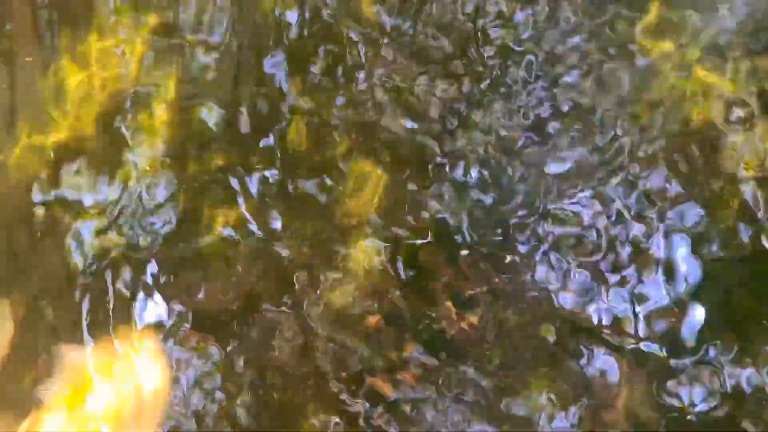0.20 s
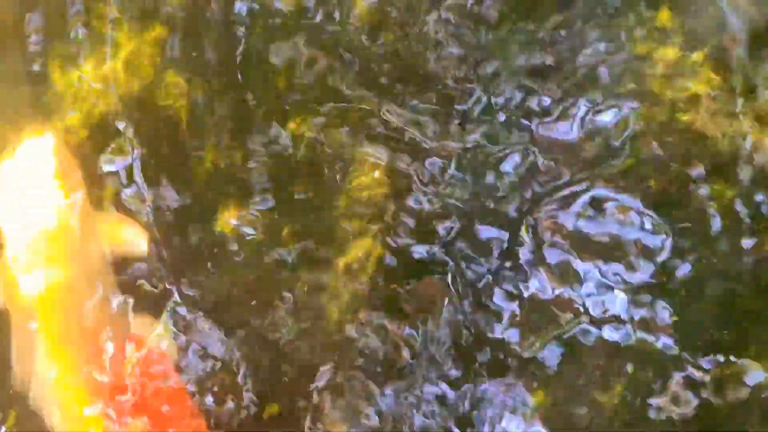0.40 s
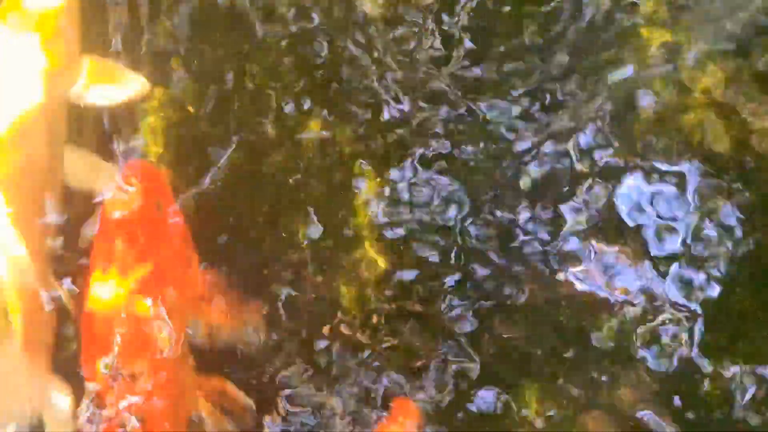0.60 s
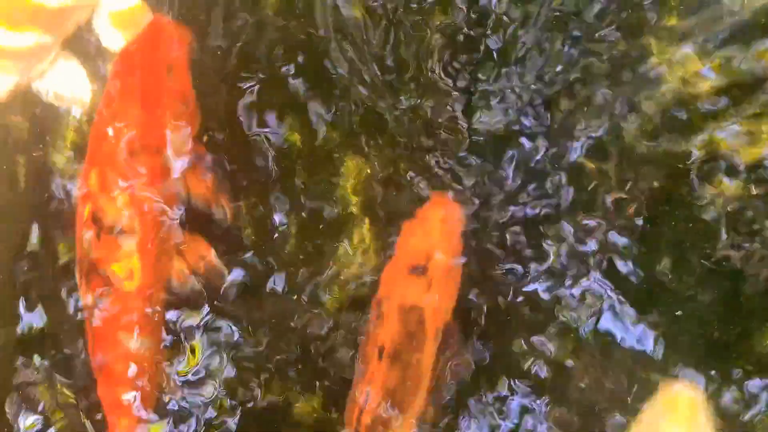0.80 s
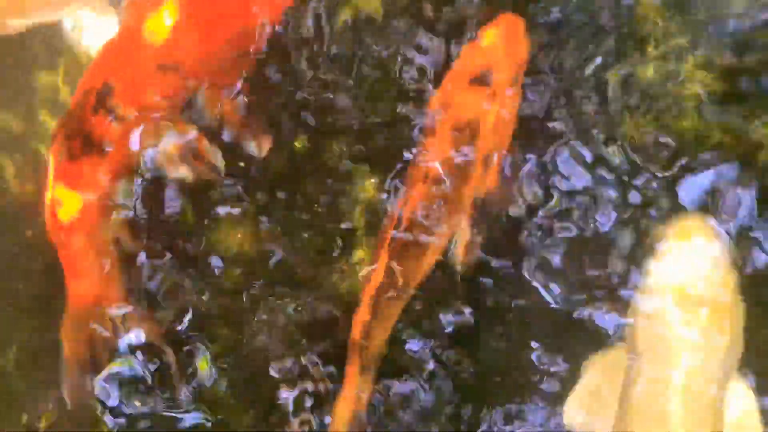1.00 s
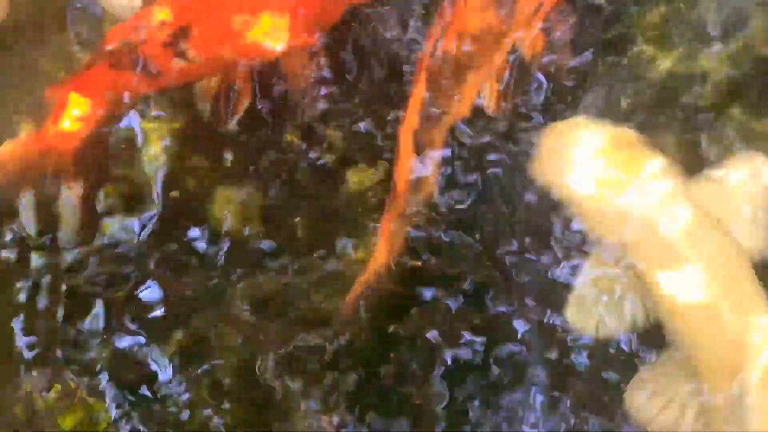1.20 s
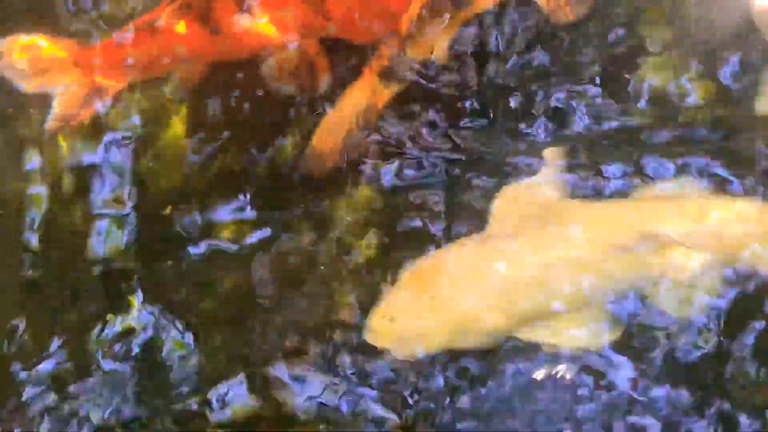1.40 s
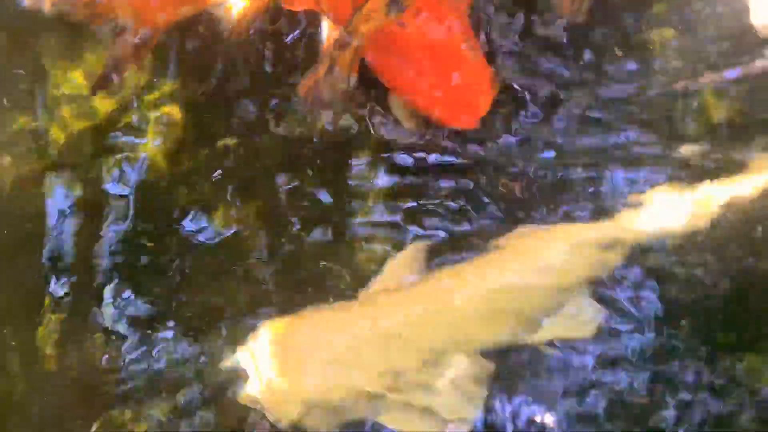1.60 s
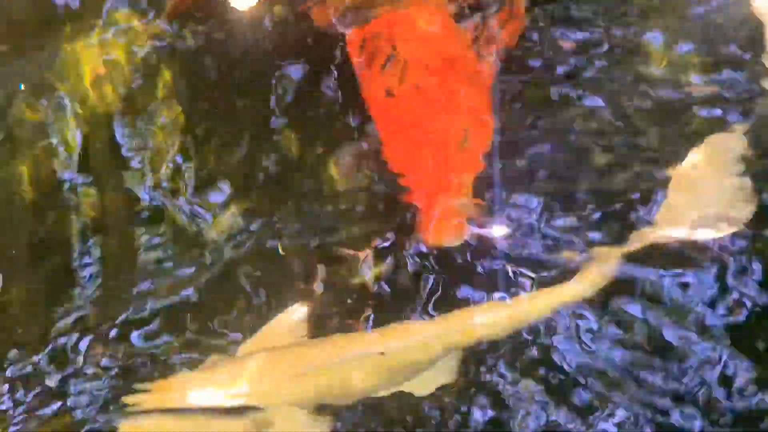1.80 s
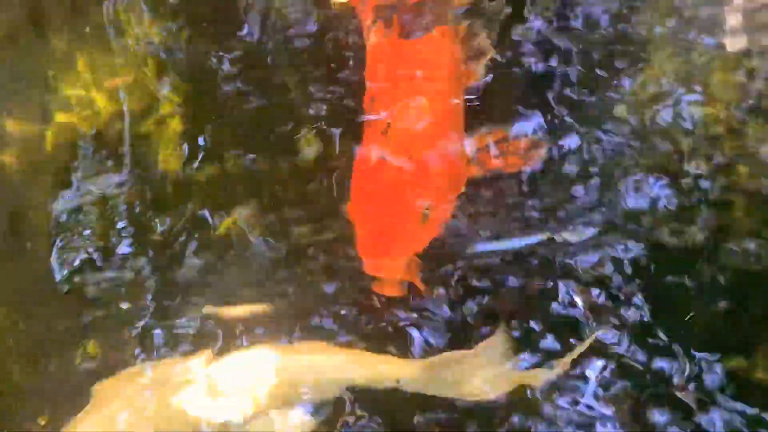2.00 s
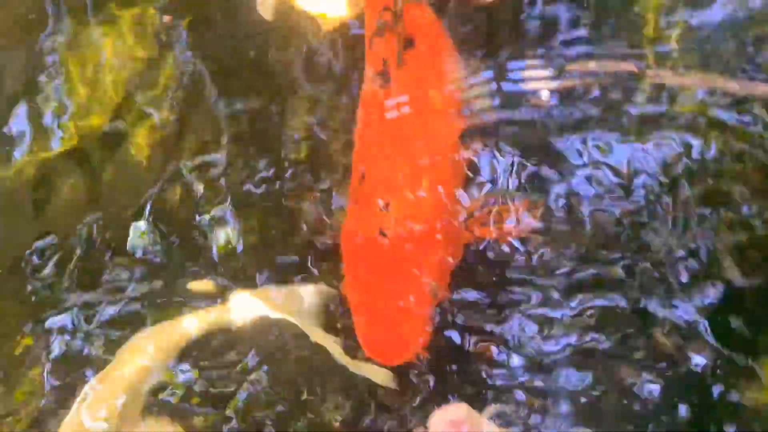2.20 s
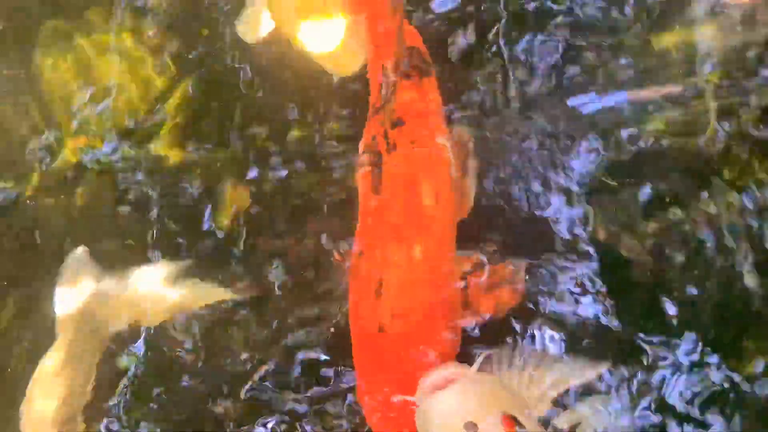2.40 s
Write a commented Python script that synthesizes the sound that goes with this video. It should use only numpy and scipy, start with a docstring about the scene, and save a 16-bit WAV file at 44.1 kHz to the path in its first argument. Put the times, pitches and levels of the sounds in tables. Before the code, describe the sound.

Fish splash and gulp close by, slightly left, at an outdoor pond. Faint trickling and low rumble with a slight hum run throughout. From 0.1 s come short bubbly plops and spray, the loudest wet plop and slap at 0.3 s, then smaller gulps until 0.6 s. A soft lap follows near 0.85 s, then sparse quiet ringing drips until 2.5 s as the trickle swells and ebbs.

```python
"""Koi feed close by at the surface of a garden pond, a little to the left. Trickling water further off
and a low outdoor rumble with a faint hum are there from the start. The fish soon trap pockets of air that
ring as gliding plops, with slaps, churned water and short sprays built from random impacts. Softer laps
and drips follow, each drip a splat and a small ringing bubble. The trickle, many tiny bubbles bursting
in clumps, swells and ebbs; the rumble is flickering bands of noise and the hum a wavering sine."""
import sys
import numpy as np
from scipy import signal
from scipy.io import wavfile

SR = 44100
rng = np.random.default_rng(int(sys.argv[2]) if len(sys.argv) > 2 else 0)


def unload_wav(signal):
    """Save mono or channel-first audio to the path in sys.argv[1] as 16-bit WAV at rate SR, clipped to [-1, 1]."""
    wavfile.write(
        sys.argv[1],
        SR,
        np.round(np.clip(np.atleast_2d(signal).T, -1, 1) * 32767).astype(np.int16),
    )


N = 110250
TIME = np.arange(N) / SR   # s
CUTOFF_HZ = 15850

# Place: the left side hears the fish louder and sooner, the trickle and drips sooner still
NEAR_PAN_DB, FISH_LEAD_S, TRICKLE_LEAD_S = 1.2, .00008, .00028
LEAD_SPREAD_S = .00009   # scatter of the lead from bubble to bubble

# Droplet impacts: chance per second in one stream, and spread of their sizes
GRAINS_PER_S, GRAIN_SPREAD_DB = 3500, 3.0


def from_db(db):
    """Decibels to gain."""
    return 10 ** (np.asarray(db) / 20)


def rms_one(x):
    """Scale to unit rms."""
    return x / np.sqrt(np.mean(x ** 2) + 1e-20)


def at_hz(points, hz):
    """Read a table of (Hz, value) on a log-frequency axis."""
    points = np.array(points)
    return np.interp(np.log(hz), np.log(points[:, 0]), points[:, 1])


def drift(corner_hz):
    """Slow random motion of rms 1: noise through two equal low-pass poles."""
    step = 40   # samples between slow points
    r = np.exp(-2 * np.pi * corner_hz * step / SR)
    noise = rng.standard_normal(N // step + 2002)
    slow = signal.lfilter([1], [1, -2 * r, r * r], noise)[2000:]   # drop the filter's start
    return np.interp(np.arange(N) / step, np.arange(len(slow)), rms_one(slow))


def add(out, start_s, x):
    """Mix a sound in at its start time."""
    i = int(start_s * SR)
    out[..., i:i + x.shape[-1]] += x[..., :N - i]


def envelope(swell_s, fade_s):
    """A smooth swell, then a fade that quickens towards -60 dB; a third of a second at most."""
    t = TIME[:SR // 3]
    swell = np.sin(np.pi / 2 * np.minimum(t / swell_s, 1))
    fade_share = np.maximum(t - swell_s, 0) / fade_s
    return swell * np.exp(-np.log(1000) * fade_share ** 1.4)   # over 1: the ring holds, then closes


def clicks(per_s, spread_db, size):
    """Random impacts of either sign, mostly small and a few large."""
    sizes = from_db(spread_db * np.minimum(rng.exponential(1, size), 5))
    sizes = sizes * rng.choice([-1, 1], size)
    return sizes * (rng.random(size) < per_s / SR)


def band_pass(x, order, low_hz, high_hz):
    """Keep one band of frequencies."""
    return signal.sosfilt(signal.butter(order, [low_hz, high_hz], "band", fs=SR, output="sos"), x)


def place(x, pan_db, lead_s):
    """Mono to stereo: positive values make the left side louder and earlier."""
    t = TIME[:len(x)]
    left = x * from_db(pan_db / 2)
    right = np.interp(t - lead_s, t, x) * from_db(-pan_db / 2)
    return np.array([left, right])


def fish():
    """Gulps and slaps close by at the surface: ringing air, flung droplets and churned water."""
    # Air pockets: start_s, pitch_hz (at the start), glide_oct_per_s, level_db (about the peak),
    # swell_s, fade_s (to -60 dB)
    plops = [(.1175, 1290, 0, -20.5, .003, .009), (.123, 1130, -20, -36, .004, .04),
             (.1975, 735, 5, -20.5, .004, .07), (.2052, 1200, 0, -16.5, .003, .012),
             (.2105, 1450, 25, -28, .004, .014), (.205, 2800, 2, -32, .005, .04),
             (.226, 850, 32, -30, .004, .025), (.2365, 1200, 12, -25, .002, .01),
             (.2365, 3350, 0, -33, .002, .007), (.2425, 1480, 35, -23, .002, .032),
             (.2425, 950, -70, -28, .002, .018), (.243, 4300, 0, -35, .002, .014),
             (.255, 340, 0, -35, .003, .028), (.3127, 890, -9, -7.6, .003, .022),
             (.311, 1560, 0, -24, .002, .01), (.3112, 660, 0, -18, .003, .016),
             (.3265, 700, -60, -22, .002, .012), (.3288, 4000, 0, -23, .001, .009),
             (.335, 550, -14, -27, .003, .024), (.3765, 1400, 0, -30, .001, .028),
             (.388, 2880, -8, -42, .003, .02), (.432, 670, 0, -44, .008, .028),
             (.4495, 305, 14, -24.5, .015, .042), (.451, 1720, 8, -37.5, .002, .025),
             (.454, 590, 3, -34, .01, .025), (.465, 700, 52, -32, .007, .03),
             (.483, 1690, 7, -35, .008, .028), (.489, 780, 0, -37, .004, .04),
             (.504, 2340, -3, -41, .003, .018), (.504, 1000, -45, -37, .005, .025),
             (.512, 1080, 7, -44, .015, .05), (.531, 420, 20, -40.5, .008, .06),
             (.560, 940, 20, -26, .002, .038), (.579, 1290, -14, -42, .004, .05),
             (.587, 1950, 3, -46, .004, .025), (.8485, 720, 0, -45, .002, .04),
             (.865, 490, 34, -35.5, .014, .048), (.882, 1290, 8, -47, .006, .03),
             (1.43, 705, 0, -52, .02, .2), (1.873, 650, 28, -42, .005, .04)]
    # A fin or lip smacks the water: start_s, level_db (peak before panning), centre_hz
    slaps = [(.2435, -25, 3000), (.3122, -19, 1700), (.329, -22, 4000), (.3772, -26, 1800),
             (.452, -30, 1500)]
    # Sprays of droplets: start_s, level_db (before panning), centre_hz, fade_s (to -60 dB)
    sprays = [(.118, -39, 1900, .024), (.202, -30, 1900, .1), (.209, -45.5, 7500, .14),
              (.236, -37, 3400, .07), (.291, -48, 4000, .06), (.3115, -36.5, 3000, .03),
              (.329, -35, 4000, .028), (.332, -48, 3500, .14), (.482, -40, 2100, .11),
              (.667, -52, 6300, .035), (.716, -52, 3300, .07), (.978, -53, 10500, .05),
              (1.078, -52, 7500, .03), (1.398, -54, 8500, .06), (1.558, -53, 3500, .12),
              (1.657, -53, 9500, .08), (1.728, -50, 10000, .03), (2.036, -53, 8000, .04),
              (2.103, -52, 5000, .07), (2.219, -50, 9500, .035), (2.458, -54, 2800, .09)]
    # Water pushed aside by a fish: start_s, level_db (before panning), centre_hz, swell_s,
    # fade_s (to -60 dB)
    sloshes = [(.085, -51, 600, .025, .14), (.203, -36, 430, .006, .15), (.311, -38, 280, .004, .16),
               (.2, -50, 80, .09, .12), (.27, -46, 1400, .03, .5), (.425, -47, 600, .04, .22),
               (.79, -52, 450, .015, .16), (.848, -52, 1100, .03, .12)]
    out = np.zeros((2, N))
    for start_s, hz, glide, db, swell_s, fade_s in plops:
        lead_s = FISH_LEAD_S + LEAD_SPREAD_S * rng.standard_normal()
        plop = bubble(hz, glide, swell_s, fade_s)
        add(out, start_s, from_db(db) * place(plop, NEAR_PAN_DB, lead_s))
        add(out, start_s, satellites(hz, db))
    for start_s, db, hz in slaps:
        add(out, start_s, from_db(db) * place(slap(hz), NEAR_PAN_DB, FISH_LEAD_S))
    side_db = NEAR_PAN_DB * np.array([[1], [-1]]) / 2
    for start_s, db, hz, fade_s in sprays:
        add(out, start_s, from_db(db + side_db) * spray(hz, fade_s))
    for start_s, db, hz, swell_s, fade_s in sloshes:
        churned = slosh(hz, swell_s, fade_s)
        add(out, start_s, from_db(db) * place(churned, NEAR_PAN_DB, FISH_LEAD_S))
    return out


def bubble(hz, glide_oct_per_s, swell_s, fade_s):
    """A pocket of air rings, a little unevenly; its pitch glides as it changes size."""
    shape = envelope(swell_s, fade_s)
    glide_s = np.minimum(TIME[:len(shape)], swell_s + fade_s / 2)   # then the pitch holds
    cycles = np.cumsum(hz * 2 ** (glide_oct_per_s * glide_s)) / SR
    # a new random strength every two cycles
    uneven = np.interp(cycles / 2, np.arange(200), rng.standard_normal(200))
    return shape * (1 + .17 * uneven) * np.sin(2 * np.pi * cycles)


def satellites(hz, plop_db, count=5):
    """Small bubbles break off a pocket just after it opens, at pitches around its own."""
    pitch_spread_oct, delay_spread_s, fade_s = .5, .012, .016
    # typical level beside a -40 dB plop, and the share of the plop's level that they follow
    typical_db, follows = -53.5, .65
    out = np.zeros((2, SR // 2))
    for delay, size, level, pan, lead in rng.standard_normal((count, 5)):
        small = bubble(hz * 2 ** (pitch_spread_oct * size), 8, .002, fade_s)
        gain = from_db(typical_db + follows * (plop_db + 40) + 2 * level)
        lead_s = FISH_LEAD_S + 2 * LEAD_SPREAD_S * lead
        add(out, delay_spread_s * abs(delay), gain * place(small, 2 * pan, lead_s))
    return out


def slap(hz):
    """One sharp impact: an impulse through a band two octaves wide, peak 1."""
    x = band_pass(signal.unit_impulse(SR // 20), 1, hz / 2, hz * 2)
    return x / np.abs(x).max()


def spray(hz, fade_s):
    """A stereo burst of tiny impacts, strongest around one droplet size."""
    width_oct, skirt_db = .5, -13   # width each way; level of the wider skirt beside the core
    shape = envelope(.09 * fade_s, fade_s)
    streams = clicks(GRAINS_PER_S, GRAIN_SPREAD_DB, size=(3, len(shape)))
    grains = .6 * streams[0] + streams[1:]   # some shared by both sides, the rest their own
    low_hz, high_hz = np.minimum([hz * 2 ** -width_oct, hz * 2 ** width_oct], CUTOFF_HZ)
    core = band_pass(grains, 2, low_hz, high_hz)
    skirt = band_pass(grains, 1, 300, 8000)
    return shape * (rms_one(core) + from_db(skirt_db) * rms_one(skirt))


def slosh(hz, swell_s, fade_s):
    """Churned water: dense impacts through a band an octave each way."""
    shape = envelope(swell_s, fade_s)
    grains = clicks(GRAINS_PER_S, GRAIN_SPREAD_DB, size=len(shape))
    return shape * rms_one(band_pass(grains, 2, hz / 2, hz * 2))


def drips():
    """Each drip splats and leaves a small ringing bubble; smaller bubbles die sooner."""
    # Single drips: start_s, level_db (about the ring's peak, before panning and echoes), pitch_hz
    drip_list = [(.6357, -48, 3430), (.6682, -45, 6470), (.7121, -47, 2970), (.9515, -37.5, 1360),
                 (.973, -46, 4740), (1.005, -49, 1360), (1.072, -49, 2200), (1.139, -47, 1330),
                 (1.1785, -48, 2960), (1.3446, -49, 4160), (1.362, -46, 770), (1.564, -39, 3440),
                 (1.6594, -49, 2580), (.672, -48, 1600), (1.875, -49, 1330), (1.888, -43, 950),
                 (1.965, -51, 1330), (2.0081, -49, 3810), (2.039, -47, 800), (2.188, -42, 1220),
                 (2.2192, -47, 3350), (2.225, -49, 950), (2.299, -45, 2270), (2.301, -49, 830),
                 (2.391, -45, 720), (2.467, -50, 1530), (2.469, -48, 740)]
    fade_at_1khz_s, fade_law = .046, .65
    splat_db, splat_s, echo_db = -15, .025, -7   # splat beside its ring; echoes beside the drips
    out = np.zeros((2, N))
    for start_s, db, hz in drip_list:
        ring = bubble(hz, 2, .002, fade_at_1khz_s * (1000 / hz) ** fade_law)
        add(out, start_s, from_db(db) * place(ring, NEAR_PAN_DB, TRICKLE_LEAD_S))
        add(out, start_s, from_db(db + splat_db) * spray(hz, splat_s))
    return out + from_db(echo_db) * banks(out)


def banks(x):
    """Scattered short echoes from the pond's edge, different on each side."""
    echoes_per_s, t60_s, gap_s = 1100, .11, .004
    t = TIME[:SR // 2]
    echoes = clicks(echoes_per_s, 2, size=(2, len(t)))
    echoes = echoes * from_db(-60 * t / t60_s) * (t > gap_s)
    echoes /= np.sqrt(np.sum(echoes ** 2, axis=1))[:, None]
    return signal.fftconvolve(x, echoes, axes=1)[:, :N]


def trickle(count=44):
    """Further off to the left, bubbles of many sizes burst in clumps, droplets spatter, a hollow rings."""
    # Size of the distant bubbles: pitch_hz, level_db (of the smallest burst, before echoes and flow)
    bubble_levels = [(450, -73), (700, -65), (1050, -68), (1400, -58.5), (1900, -61), (3000, -58.5),
                     (5000, -61), (8000, -60), (11500, -58.5), (15000, -66)]
    # Strength of the trickle: time_s, gain_db
    flow = [(.45, 0), (.7, 2), (.86, -2), (1.12, 3), (1.31, -2.5), (1.4, .5), (1.6, 1.5), (1.88, -2.5),
            (2.13, -2.5), (2.24, 2), (2.39, -3.5), (2.5, 0)]
    # Hollow where the trickle lands: pitch_hz, level_db (rms)
    hollow = [(633, -76), (701, -67), (845, -72)]
    base_per_s, spread_db, ring_cycles, clump = 750, 3.5, 34, .85   # rings last 34 cycles to -60 dB
    spatter_per_s, spatter_db, spatter_fade_s = 22, -60, .03
    echo_db, hollow_q = -2, 28
    out = np.zeros((2, N))
    for hz in np.geomspace(450, 15000, count):
        hz = hz * rng.uniform(.97, 1.03)
        r = np.exp(-np.log(1000) * hz / (ring_cycles * SR))
        w = 2 * np.pi * hz / SR
        # small bubbles burst more often
        rate = base_per_s / count * np.sqrt(hz / 2000) * np.exp(clump * drift(6))
        bursts = clicks(rate, spread_db, size=N) + 1e-18   # the offset keeps the filter off denormals
        rings = signal.lfilter([0, np.sin(w)], [1, -2 * r * np.cos(w), r * r], bursts)
        lead_s = TRICKLE_LEAD_S + LEAD_SPREAD_S * rng.standard_normal()
        out += from_db(at_hz(bubble_levels, hz)) * place(rings, 0, lead_s)
    for when, size, level in rng.random((int(spatter_per_s * N / SR), 3)):
        droplets = spray(7500 * 2 ** (1.5 * size - 1), spatter_fade_s)
        add(out, when * N / SR, from_db(spatter_db) * 2 * level * droplets)
    out = out + from_db(echo_db) * banks(out)
    out = out * from_db(np.interp(TIME, *np.transpose(flow)))
    for hz, db in hollow:
        ring = signal.lfilter(*signal.iirpeak(hz, hollow_q, fs=SR), clicks(base_per_s, spread_db, size=N))
        out += from_db(db) * place(rms_one(ring), 0, TRICKLE_LEAD_S)
    return out


def wash():
    """Far water and outdoor rumble: half-octave bands of noise, each with its own flicker."""
    # Colour of the wash: freq_hz, density_db (per Hz, relative)
    colour = [(25, -10), (42, 1.5), (60, -2.5), (82, 2), (110, -6), (166, -12), (309, -13), (451, -19),
              (750, -19.5), (1000, -24), (1400, -21), (2900, -23), (5300, -29), (10000, -32), (11900, -28),
              (13200, -34), (16000, -36)]
    # How alike the two sides are: freq_hz, correlation (1 is the same, 0 unrelated)
    likeness = [(40, .65), (130, .87), (290, .8), (640, .35), (1400, -.1), (3100, 0), (15000, 0)]
    level_db, patchy_db, swell_db = -54, 2.2, 1.0   # overall rms; flicker per band; common swell
    out = np.zeros((2, N))
    together = drift(4)
    edges_hz = 22 * 2 ** np.arange(0, 9.6, .5)
    white = rng.standard_normal((2, 2, N))   # neighbouring bands take turns with two noises
    for k, (low_hz, high_hz) in enumerate(zip(edges_hz, edges_hz[1:])):
        mid, side = band_pass(white[k % 2], 2, low_hz, high_hz)
        hz = np.sqrt(low_hz * high_hz)
        alike = np.clip(at_hz(likeness, hz), -1, 1)
        flicker_db = patchy_db * min(1, hz / 300) * drift(14)   # deep bands are steadier
        gain = from_db(at_hz(colour, hz) + swell_db * together + flicker_db)
        stereo = np.sqrt(1 + alike) * mid + np.sqrt(1 - alike) * side * [[1], [-1]]
        out += gain * stereo
    return from_db(level_db) * rms_one(out)


def hum():
    """A faint low hum: a sine whose level and phase waver."""
    hum_hz, level_db, waver_db, wander_rad = 81, -59.5, 3, 1.1
    tone = np.sin(2 * np.pi * hum_hz * TIME + wander_rad * drift(5))
    return from_db(level_db) * rms_one(from_db(waver_db * drift(6)) * tone)


def scene():
    """The pond: fish close by with the bank's echoes, then drips, trickle and the open air behind."""
    near = fish()
    near_echoes = from_db(-12) * banks(near)
    return near + near_echoes + drips() + trickle() + wash() + hum()


def record(dry):
    """The top is cut steeply above the cutoff."""
    return signal.sosfilt(signal.ellip(12, .1, 80, CUTOFF_HZ, fs=SR, output="sos"), dry)


dry = scene()
out = record(dry)
unload_wav(out)
```